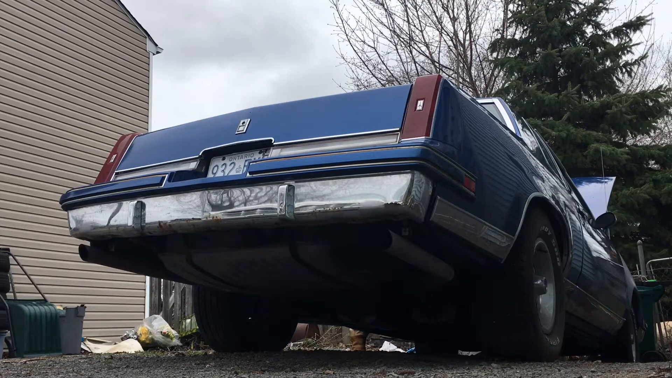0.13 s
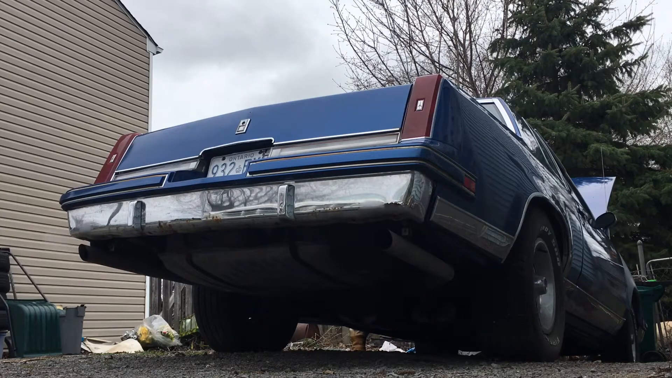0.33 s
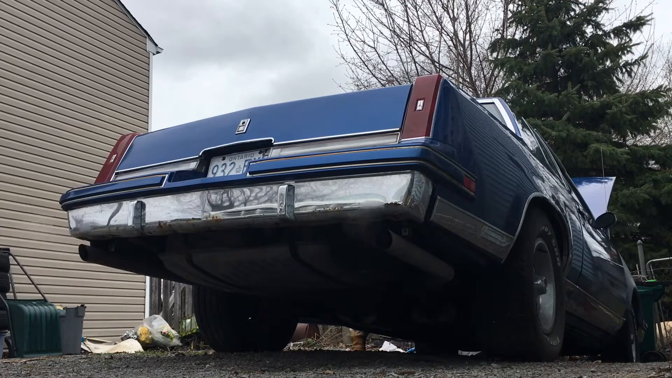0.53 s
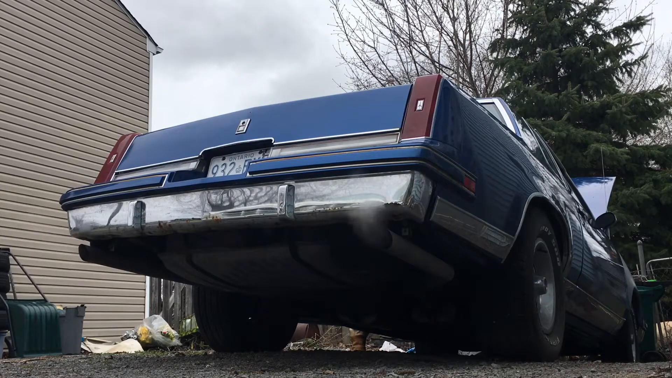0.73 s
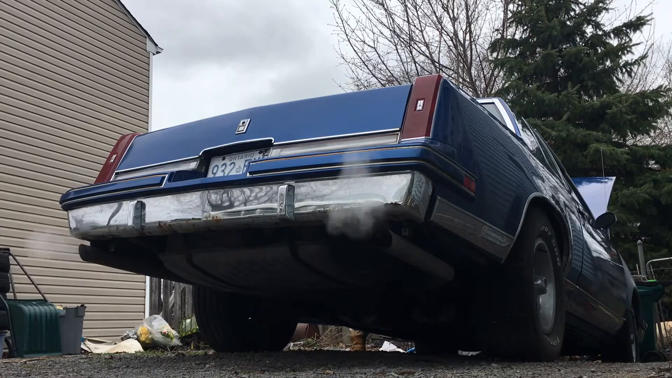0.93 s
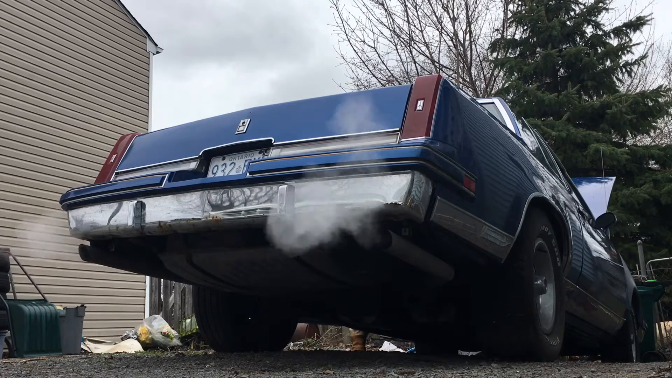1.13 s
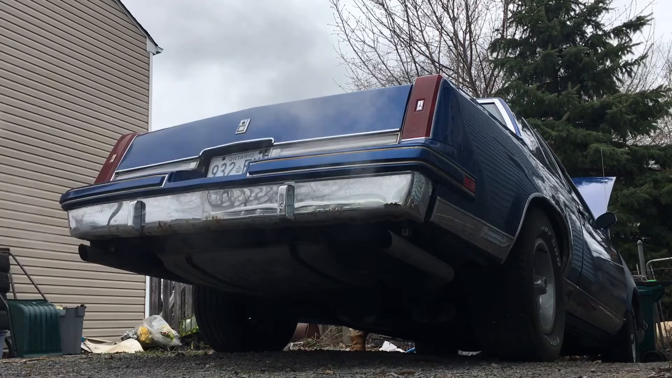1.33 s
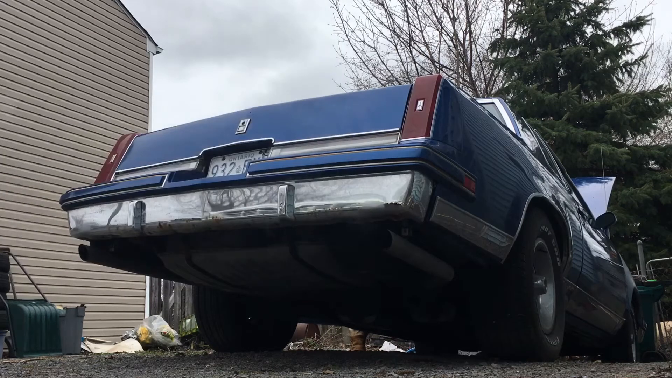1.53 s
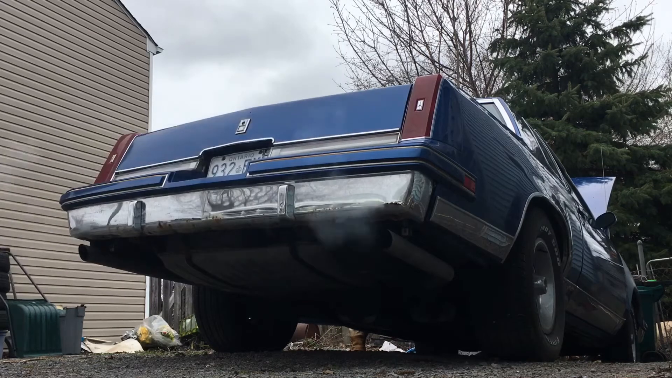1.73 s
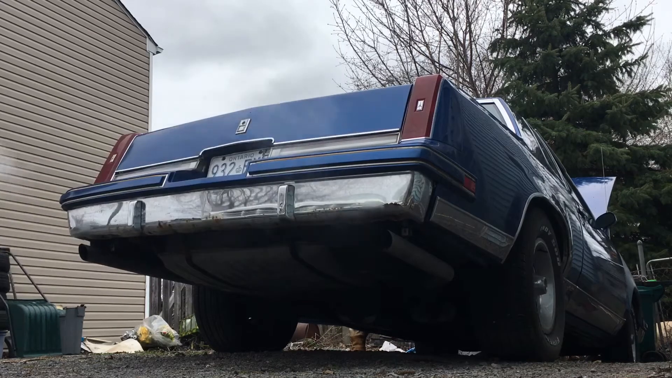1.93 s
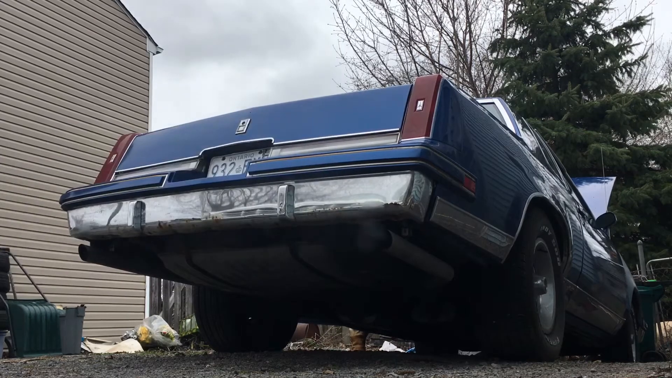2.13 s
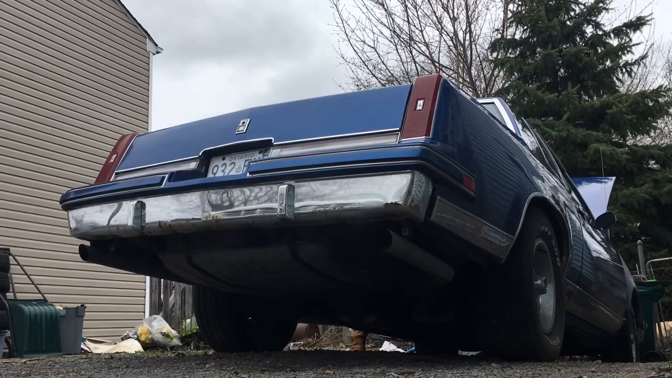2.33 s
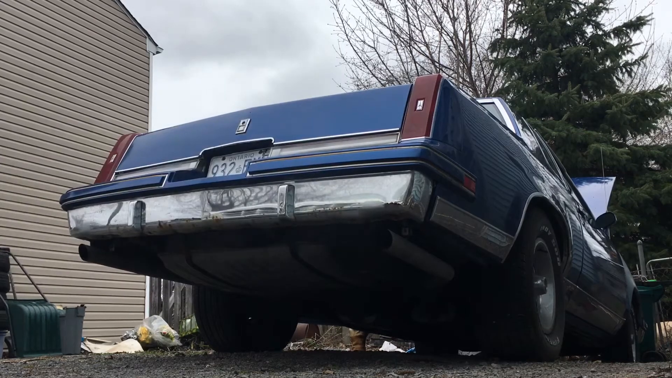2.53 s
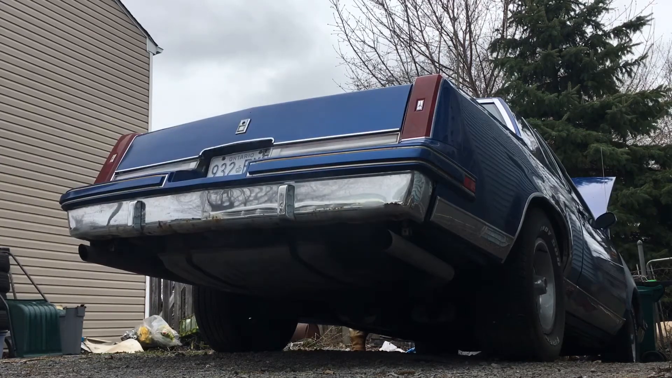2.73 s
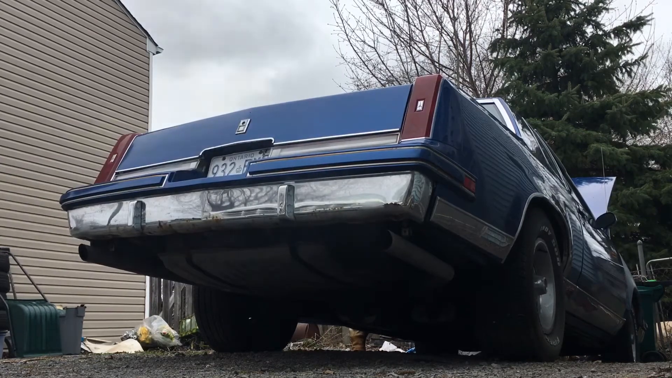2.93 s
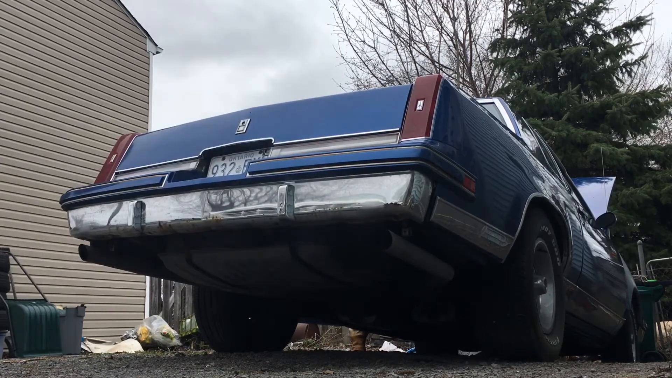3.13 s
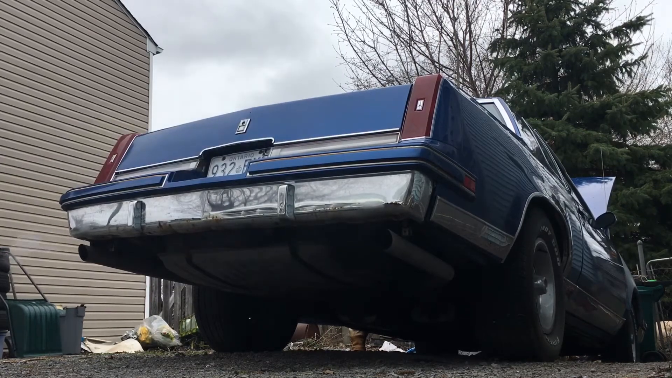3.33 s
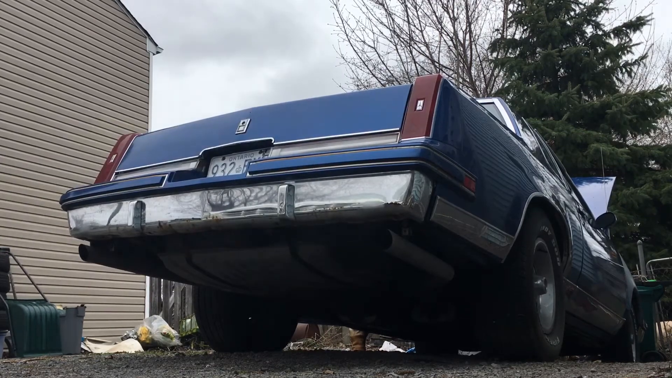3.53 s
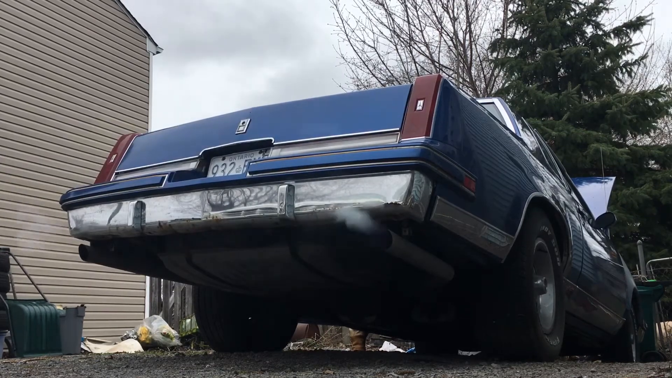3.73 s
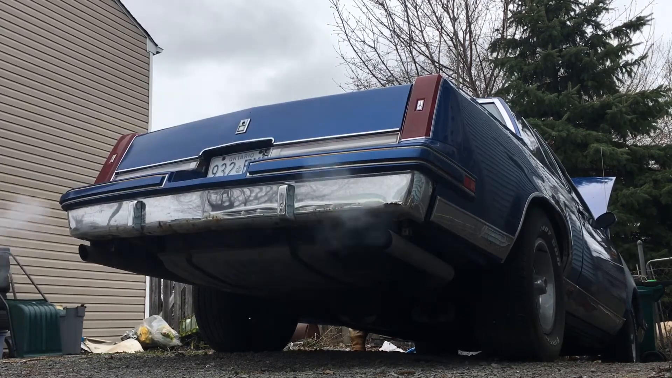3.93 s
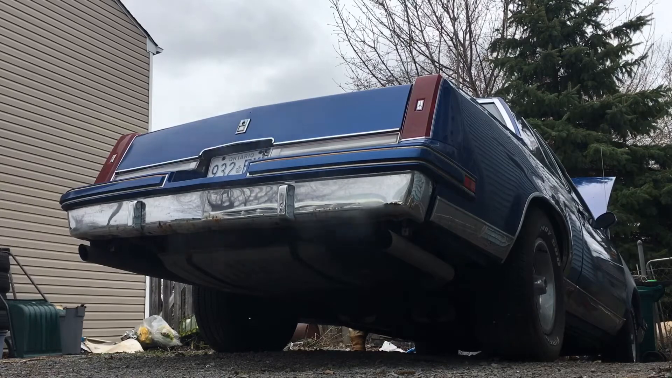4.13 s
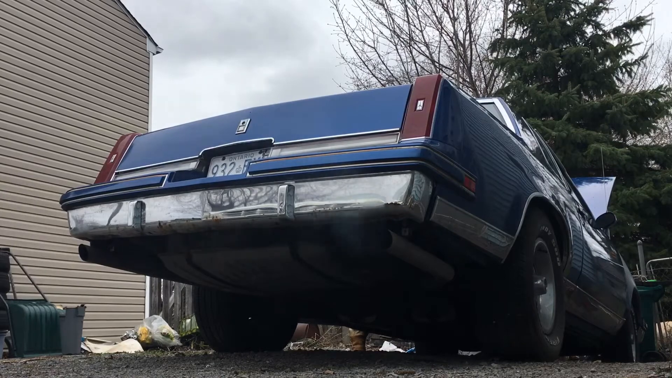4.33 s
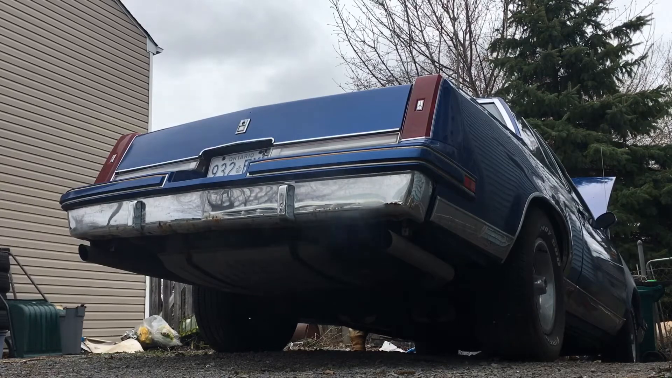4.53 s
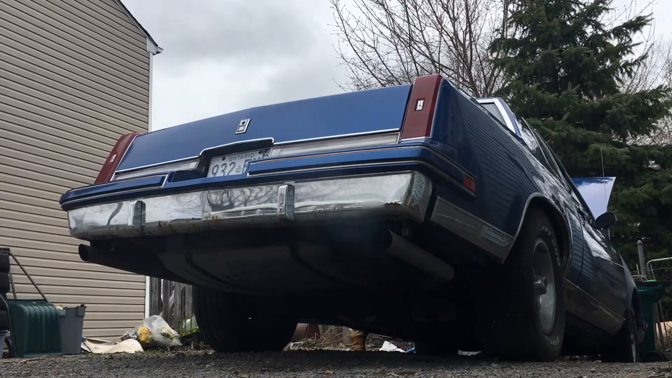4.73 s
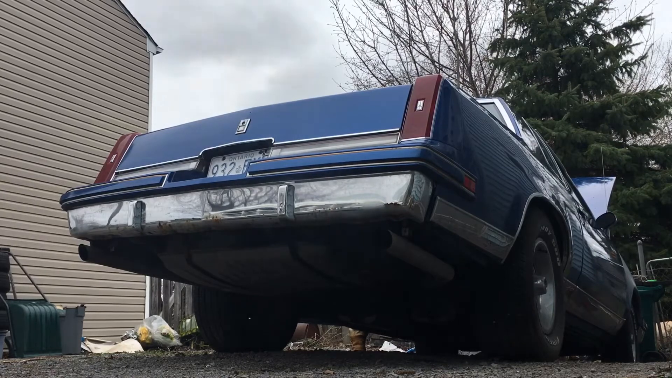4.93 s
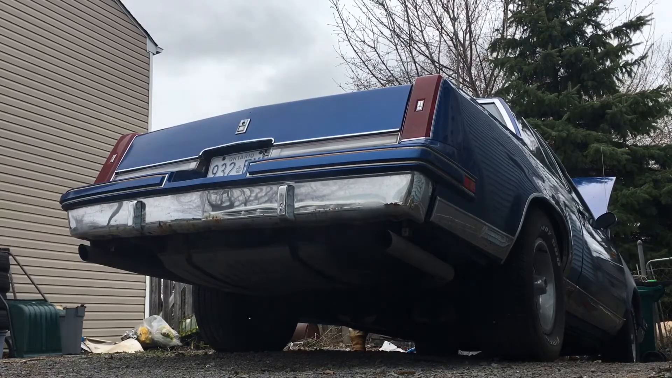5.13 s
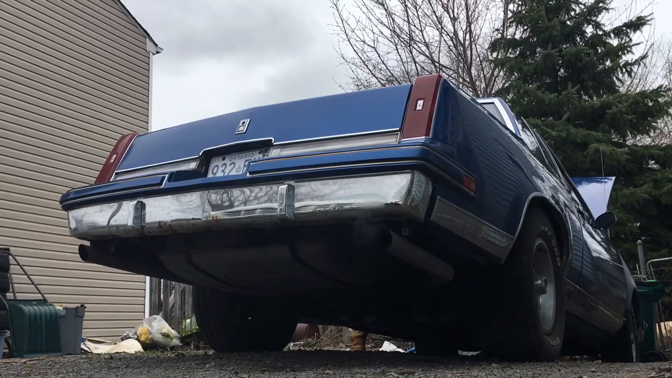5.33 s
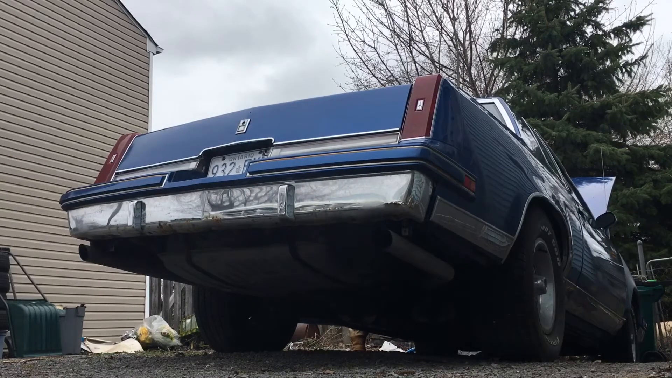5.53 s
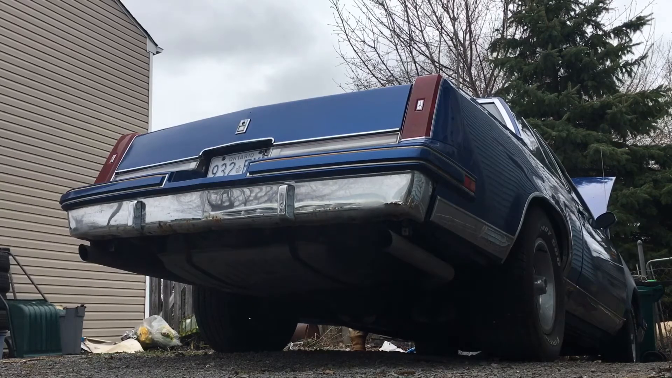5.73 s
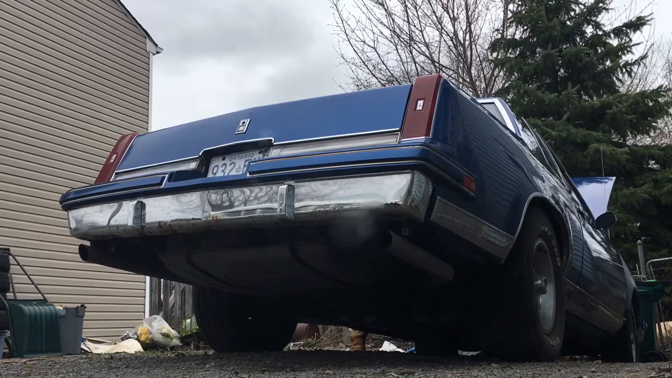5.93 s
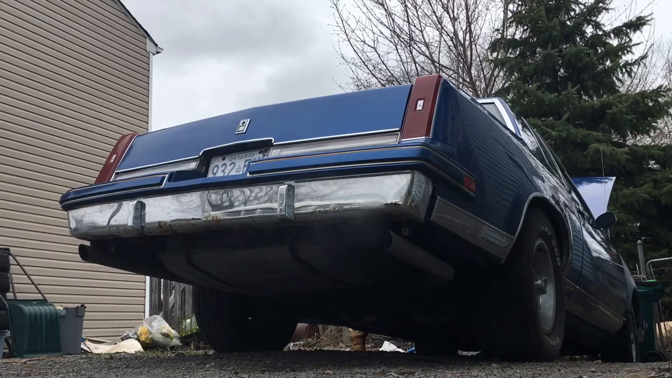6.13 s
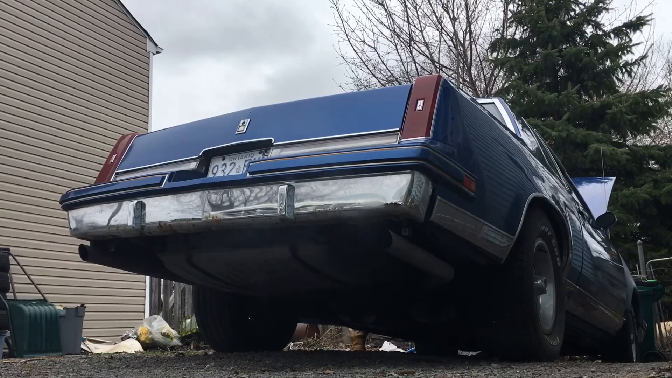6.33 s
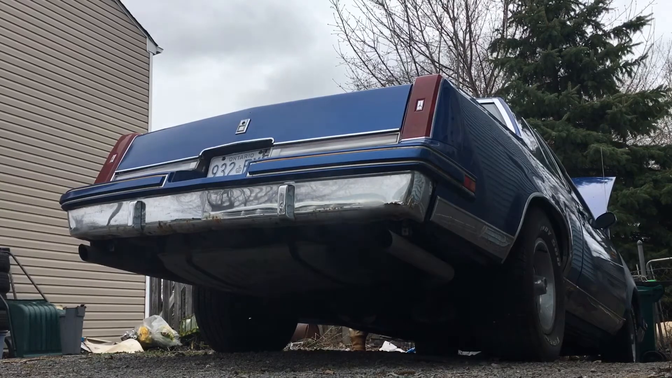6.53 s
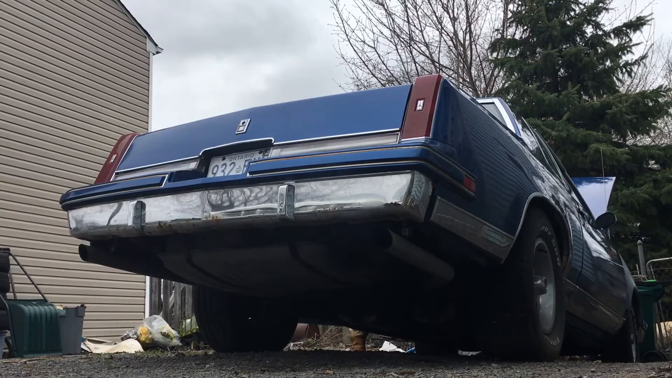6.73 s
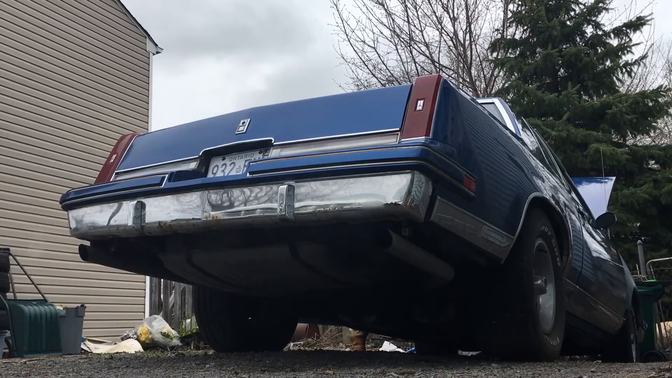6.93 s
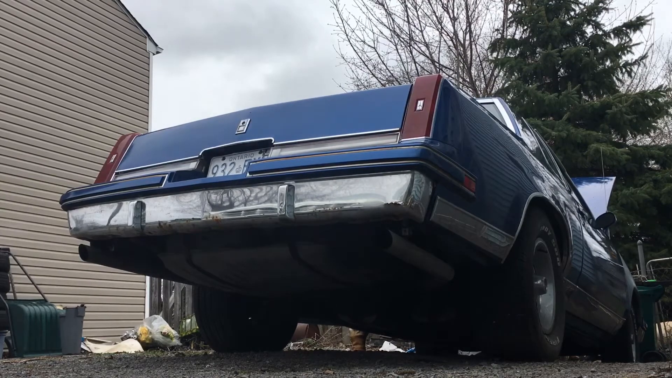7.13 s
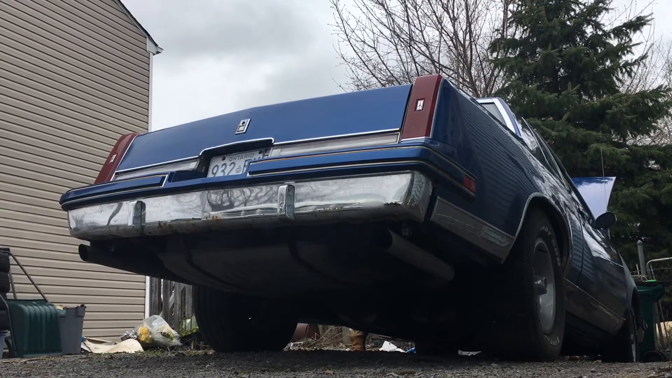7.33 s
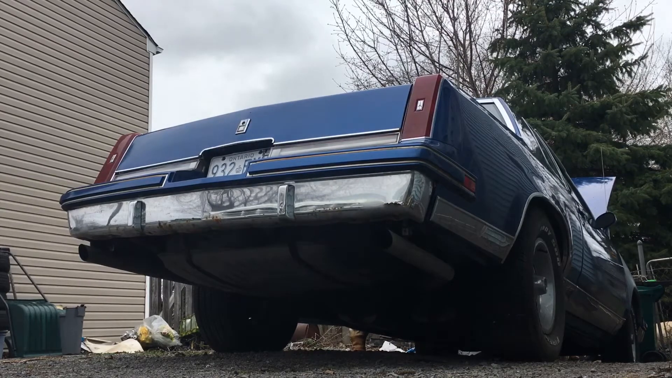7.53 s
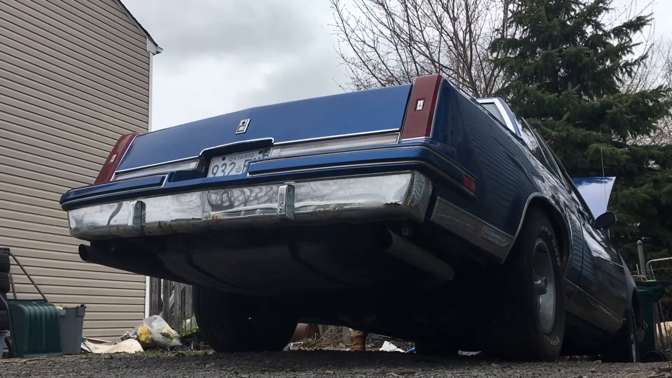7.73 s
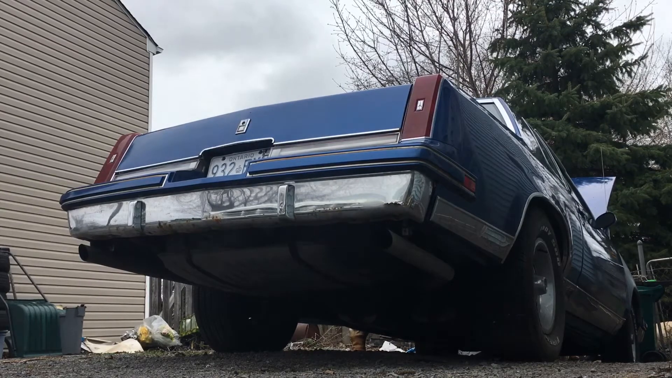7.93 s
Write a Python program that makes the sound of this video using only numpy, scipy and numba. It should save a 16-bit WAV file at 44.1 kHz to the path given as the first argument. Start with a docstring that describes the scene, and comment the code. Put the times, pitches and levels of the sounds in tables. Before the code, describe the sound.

A starter whines and grinds for a second, then a big V8 catches with a roar, revs three times with sharp exhaust cracks, and idles.

```python
"""A starter whines and grinds, a big V8 flares as it catches, is blipped three times and lopes at a fast idle.
Place: a driveway, phone on the ground just behind the twin straight pipes, a house wall near by.
Uneven firings ring pipes of unequal length; gas rasps and hisses at the outlets and cracks under throttle.
The starter is a sagging pinion tone, gear noise and motor drone, with puffs from the pipes.
The quiet yard is steady coloured noise."""
import sys
import numpy as np
from scipy import signal
from scipy.fft import rfft, irfft
from scipy.io import wavfile
from scipy.ndimage import uniform_filter1d
from numba import njit

SR = 44100
rng = np.random.default_rng(int(sys.argv[2]) if len(sys.argv) > 2 else 0)


def wrap_up_sound(samples):
    """Save the sound to the file named by the first command line argument, as 16-bit audio."""
    columns = np.atleast_2d(samples).T
    # keep every value between -1 and 1, then stretch to whole-number steps
    tamed = np.clip(columns, -1, 1)
    steps = np.round(tamed * 32767).astype(np.int16)
    wavfile.write(sys.argv[1], SR, steps)


def boost_factor(decibels):
    """Convert a level in decibels to a linear amplitude factor."""
    exponent = np.asarray(decibels, float) / 20
    return 10 ** exponent


N = 352800
TIME = np.arange(N) / SR


def curves(rows):
    """Columns of a table, joined by straight lines in time."""
    s, *columns = np.transpose(rows)
    return [np.interp(TIME, s, c) for c in columns]


def unit(x):
    """Scale to rms 1."""
    return x / np.sqrt(np.mean(x ** 2))


def band(x, low_hz, high_hz):
    """Steep band-pass."""
    return signal.sosfilt(signal.butter(3, [low_hz, high_hz], "band", fs=SR, output="sos"), x)


def ring(x, modes):
    """Parallel resonances, each (pitch_hz, width_hz, level_db)."""
    return sum(boost_factor(db) * signal.lfilter(*signal.iirpeak(hz, hz / width, SR), x) for hz, width, db in modes)


@njit
def glide(x, hz, width):
    """State-variable band-pass with a moving centre."""
    y, b, l = np.empty(len(x)), 0., 0.
    for i in range(len(x)):
        g, k = np.tan(np.pi * hz[i] / SR), width / hz[i]
        v = (b + g * (x[i] - l)) / (1 + g * (g + k))
        b, l, y[i] = 2 * v - b, l + 2 * g * v, k * v
    return y


def noise(spectrum):
    """Noise of rms 1 with the colour of (pitch_hz, level_db) points."""
    hz, db = np.transpose(spectrum)
    bins_hz = np.arange(N // 2 + 1) * SR / N
    gain = boost_factor(np.interp(np.log(bins_hz + 1), np.log(hz), db))
    return unit(irfft(rfft(rng.standard_normal(N)) * gain, N))


def clicks(seconds, sizes):
    """An impulse at each time."""
    out = np.zeros(N)
    np.add.at(out, np.clip((np.asarray(seconds) * SR).astype(int), 0, N - 1), sizes)
    return out


def fade(x, tau_s):
    """Each impulse becomes an exponential tail of the same height."""
    return signal.lfilter([1], [1, -np.exp(-1 / (tau_s * SR))], x)


# layers of the running engine: start_s, bark level_db, bass level_db, treble (hiss) level_db
ENGINE = [(1.15, -16.5, -8, -28), (1.19, -20, -12, -36.5), (1.32, -7, -9.5, -30.5),
          (1.43, -7.5, -10.5, -35.5), (1.53, -24.5, -20, -59), (1.7, -24, -19.5, -59),
          (1.87, -28, -24.5, -56), (1.95, -14.5, -16, -45), (2.07, -8, -12, -28), (2.18, -18.5, -16, -60.5),
          (2.33, -20, -15, -58.5), (2.58, -25.5, -21, -61.5), (2.94, -10, -9, -47.5),
          (3.08, -9, -18, -29.5), (3.19, -13.5, -20, -46.5), (3.23, -13, -4.5, -38),
          (3.36, -15, -13, -42.5), (3.53, -17, -10.5, -59), (3.67, -25.5, -20.5, -63.5),
          (3.9, -25, -18.5, -59.5), (4.07, -28.5, -23.5, -64), (4.15, -22.5, -16.5, -54.5),
          (4.5, -21.5, -18, -55), (4.79, -19, -17, -50.5), (4.87, -15, -9.5, -44), (4.94, -13.5, -5.5, -42),
          (4.96, -4.5, -12, -26), (5.02, -8, -6.5, -44), (5.14, -11, -3, -30), (5.18, -8, -25, -30),
          (5.27, -15, -16, -45), (5.31, -12, -4, -36.5), (5.44, -14, -11.5, -40.5), (5.71, -21, -16.5, -62),
          (5.9, -23.5, -19.5, -63), (6.3, -22.5, -18.5, -58.5), (6.8, -20, -15.5, -55.5),
          (7.27, -22.5, -16, -56.5), (7.5, -22.5, -20, -59), (7.92, -24.5, -15, -52),
          (8.0, -20, -10, -56.5)]
FIRST_FIRING_S = 1.172
RASP_DB, RASP_PER_BARK, RASP_PER_HISS = -9, 0.48, 0.3  # the rasp follows bark and hiss
CATCH_RASP_DB, CATCH_S = 3.5, 0.28  # the cold catch rasps harder, fading over this time
RASP_FLUTTER_DB = 2  # rms
FLOW_IN_EDGE = 2.6  # turbulence against clean slugs
SMALL_CRACK_DB, SMALL_SCATTER_DB = 6, 3.5  # every firing cracks a little: drive above the hiss, spread
COLD_UNTIL_S, COLD_CRACK_DB = 1.55, -12  # the cold engine hardly cracks


def engine():
    """Firings ring both pipes; the gas jet after each one rasps and hisses at the outlets."""
    bark_db, rumble_db, hiss_db = curves(ENGINE)
    throttle = np.clip((bark_db + 22) / 10, 0, 1)  # the bark follows the gas flow
    settled = 1 - np.exp(-((TIME - ENGINE[0][0]) / CATCH_S) ** 2)
    load = throttle * settled
    flutter = unit(uniform_filter1d(uniform_filter1d(rng.standard_normal(N), size=1100), size=1100))
    rasp_db = RASP_DB + RASP_PER_BARK * bark_db + RASP_PER_HISS * hiss_db
    rasp_db = rasp_db + CATCH_RASP_DB * (1 - settled) + RASP_FLUTTER_DB * flutter
    running = TIME > FIRST_FIRING_S

    cycle_hz, cycles = crankshaft(running)
    seconds, size, jet_db, crack_chance = firings(cycle_hz, cycles)
    slug = unit(-fade(clicks(seconds, size), .0003))
    jet = fade(clicks(seconds, size * boost_factor(jet_db)), .004)
    jet = jet / uniform_filter1d(jet, size=SR // 8).clip(1e-6)
    flow = unit(rng.standard_normal(N) * (3.5 + jet))

    edge = unit(band(slug + FLOW_IN_EDGE * flow, 980, 1790))
    sound = boost_factor(bark_db - 13.0) * (0.13 + settled * throttle ** 2.17) * edge
    sound = sound + boost_factor(rumble_db) * rumble(slug, flow, throttle, cycle_hz)
    sound = sound + boost_factor(bark_db) * bark(slug, flow, throttle, load, flutter, cycles)
    sound = sound + boost_factor(rasp_db) * rasp(slug, jet, throttle, load, bark_db)
    sound = sound + boost_factor(hiss_db) * hiss(jet)

    small_db = np.interp(seconds, TIME, hiss_db) + SMALL_CRACK_DB + SMALL_SCATTER_DB * crack_chance
    small_db = small_db + COLD_CRACK_DB * (seconds < COLD_UNTIL_S)
    return running * sound + cracks(seconds, small_db) + pops() + thuds()


# engine speed: start_s, pitch_hz (four-stroke cycles per second)
SPEED = [(1.13, 4.5), (1.27, 6.5), (1.35, 12), (1.5, 19), (1.8, 11.5), (1.9, 13), (2.1, 26), (2.15, 28),
         (2.6, 14.1), (2.72, 14.6), (2.95, 26.3), (3.08, 33.9), (3.155, 36.7), (3.8, 14.9), (3.9, 13.6),
         (4.0, 10.7), (4.2, 11.6), (4.7, 11.75), (4.8, 12.6), (5.1, 29.4), (5.2, 36.5), (5.23, 37.4),
         (5.7, 20.6), (6.0, 15.5), (6.2, 14.35), (7.1, 14.2), (7.5, 12.2), (8.0, 9.85)]


def crankshaft(running):
    """Speed gained or lost at a steady percentage between rows, and the cycles turned so far."""
    start_s, speed_hz = np.transpose(SPEED)
    cycle_hz = np.exp(np.interp(TIME, start_s, np.log(speed_hz)))
    return cycle_hz, np.cumsum(cycle_hz * running) / SR


# cylinders in firing order: strength level_db, change when the idle lopes level_db,
# travel through the left or the longer right pipe delay_s
CYLINDERS = [(0.3, -16, .0005), (-.8, -2, .0030), (.6, 1, .0038), (-.3, 1, .0001), (.8, -1, .0027),
             (-.6, 3, .0008), (.3, 4.5, .0002), (-.3, -3, .0035)]
# how much the idle lopes: start_s, share (0-1)
LOPE = [(1.2, .8), (1.85, .7), (2.0, .4), (2.3, .15), (2.6, .5), (2.9, .3), (3.6, .15), (3.95, .9),
        (4.1, 1), (4.75, 1), (5.0, .4), (5.6, .15), (5.9, .5), (6.2, .3), (7.2, .3), (7.6, .9), (8.0, .9)]
# uneven burning: start_s, scatter of firing strength scatter_db
UNEVEN = [(1.1, 3), (1.5, 2.2), (2.1, 4), (2.2, 1), (2.45, 2.5), (2.75, 1.5), (3.2, .7), (3.6, 1), (3.9, 3),
          (4.2, 1), (4.8, 2), (5.1, 2.5), (5.3, .7), (5.7, 1.5), (5.9, 2.5), (6.2, .6), (7.3, .8),
          (7.6, 1.5)]
FIRST_CYLINDER = 4  # the row, counted from 0, that catches first
TIMING_S, TIMING_S_PER_DB = .00024, .00008  # spread of the moment a slug leaves; uneven burning widens it


def firings(cycle_hz, cycles):
    """Each cylinder in turn sends a slug of gas down its pipe, early or late, strong or weak by chance."""
    fired = len(CYLINDERS) * cycles
    count = np.arange(1, int(fired[-1]))
    row = (count - 1 + FIRST_CYLINDER) % len(CYLINDERS)
    strength_db, lope_db, travel_s = np.array(CYLINDERS)[row].T
    timing, strength, jet, crack = rng.standard_normal((4000, 4))[count].T
    seconds = np.interp(count, fired, TIME) + travel_s
    strength_db = strength_db + lope_db * np.interp(seconds, *np.transpose(LOPE))
    scatter_db = np.interp(seconds, *np.transpose(UNEVEN))
    seconds = seconds + (TIMING_S + TIMING_S_PER_DB * scatter_db) * timing
    size = boost_factor(strength_db + scatter_db * strength)
    # sparser firings are each heard stronger, so the level does not ride on speed
    size = size / np.sqrt(np.interp(seconds, TIME, cycle_hz))
    return seconds, size, 2.5 * jet, crack


# deep pipe resonances: pitch_hz, width_hz, relative level_db
PIPE_LOW = [(59, 17.6, -7.5), (107.3, 36, -0.1)]
FLOW_IN_RUMBLE_DB = -3  # turbulence against clean slugs


def rumble(slug, flow, throttle, cycle_hz):
    """The long pipes swallow the sharp edge of each slug and leave their deep resonances."""
    drive = slug + boost_factor(FLOW_IN_RUMBLE_DB) * flow
    deepest = ring(drive, PIPE_LOW[:1])
    upper = ring(ring(drive, PIPE_LOW[1:]), PIPE_LOW[1:])
    pipes = unit(band(deepest + upper, 34.3, 158.4))
    out = (1 - 0.44 * throttle) * pipes + 0.5 * throttle * unit(band(slug, 70.7, 226.0))
    # hard firings at low speed pump the deepest resonance
    pumping = throttle * (8.0 / cycle_hz.clip(12)) ** 1.34
    return out + pumping * unit(band(slug, 39.4, 83.5))


# upper pipe resonances: pitch_hz, width_hz, relative level_db
PIPE_HIGH = [(213.3, 67, 10.5), (314, 12, 9), (421, 18.4, 0.5), (508, 7.7, -2.5), (629.3, 40.6, 5),
             (743, 52, -6), (1083, 230, -7)]
# clean engine tones under throttle: multiple of the cycle, peak level_db against the bark
LOAD_TONES = [(3, -12.5), (5, -7.5), (8, -10), (9, -8), (13, -14.5), (17, -15.5)]
FLOW_IN_BARK_DB = 6  # turbulence against clean slugs
PIPE_WAVER, PIPE_RISE = 0.032, 0.016  # resonances waver with gas heat and rise under throttle, as shares
PIPE_NOTE_MULTIPLE, PIPE_NOTE_DB = 22, 3.5  # at fast idle this cycle multiple meets a pipe resonance


def bark(slug, flow, throttle, load, flutter, cycles):
    """Slugs and turbulence ring wavering pipe resonances; throttle adds bare slugs and clean tones."""
    drive = slug + boost_factor(FLOW_IN_BARK_DB) * flow
    pipes = np.zeros(N)
    for k, (hz, width, db) in enumerate(PIPE_HIGH):
        waver = PIPE_WAVER * np.roll(flutter, k * SR)
        pipes += boost_factor(db) * glide(drive, hz * (1 + PIPE_RISE * throttle + waver), 1. * width)
    pipes = unit(band(pipes, 169.0, 801))
    # strong flow damps the pipe, so the slugs come out bare and steep
    bare = unit(band(slug + 0.13 * flow, 274, 848))
    turn = 2 * np.pi * cycles
    tones = sum(boost_factor(db) * np.sin(round(k) * turn) for k, db in LOAD_TONES)
    note = ring(np.sin(PIPE_NOTE_MULTIPLE * turn), [(312.6, 9.6, .1)])
    return (1 - 0.18 * load) * pipes + 0.52 * load * bare + load * tones + boost_factor(PIPE_NOTE_DB) * note


# outlet resonances: pitch_hz (the first at its lowest), width_hz, level_db (the second only)
OUTLET = [(2104, 870, .1), (3080, 1030, .1)]
OUTLET_RISE_HZ_PER_DB = 32.5  # hotter, faster gas lifts the lower outlet resonance


def rasp(slug, jet, throttle, load, bark_db):
    """Turbulent gas, pulsing with the jets, excites the resonances of the outlets."""
    turbulence = 1.11 - 0.19 * throttle + 1.06 * load * jet ** 1.47 + 0.11 * jet
    gas = rng.standard_normal(N) * turbulence + 0.89 * load * slug
    low_hz = OUTLET[0][0] + OUTLET_RISE_HZ_PER_DB * np.clip(bark_db + 28.5, 0, 16)
    low_width_hz = 1. * OUTLET[0][1]
    low = unit(glide(glide(gas, low_hz, low_width_hz), low_hz, low_width_hz))
    high = unit(ring(ring(gas, OUTLET[1:]), OUTLET[1:]))
    return unit(low + (0.017 + 0.54 * load) * high)


# colour of the hiss: pitch_hz, relative level_db (per Hz)
HISS = [(2060, -27), (3500, -14), (4400, -1.5), (4930, -29), (5460, -1.5), (7090, -9.5), (8530, -6.5),
        (11100, -13), (15100, -18.5), (16000, -30.5)]


def hiss(jet):
    """Fine turbulence at the outlets, swelling with each jet."""
    return unit(noise(HISS) * (.5 + jet ** 0.5))


# loudest exhaust cracks: start_s, relative snap level_db, relative chirp level_db
CRACKS = [(1.381, -27, -20), (1.455, -26, -15), (1.9245, -39, -36), (1.9738, -23, -22), (2.0163, -29, -15),
          (2.0316, -7, -11.5), (2.063, -4.5, -8.5), (2.0714, -13, -13), (2.1021, -13, -16),
          (2.139, -16.5, -13), (2.798, -36, -27), (2.817, -30, -22), (2.8497, -21, -18), (2.8843, -15, -14),
          (2.9273, -18, -16), (2.9642, -19, -15), (2.9712, -13, -15), (3.0072, -16, -17), (3.04, -18, -12),
          (3.0634, -10, -8), (3.0706, -17, -9), (3.0929, -13, -10), (3.1212, -20, -12), (3.1578, -24, -16),
          (3.165, -26, -18), (3.2001, -22, -14.5), (3.229, -21, -12), (3.2374, -29, -24),
          (3.2595, -22, -19), (3.2916, -22.5, -17), (3.3243, -28, -20), (3.361, -28, -23),
          (3.4383, -31, -25), (4.842, -32, -31), (4.882, -33, -28), (4.9536, -8, -18), (4.9724, -23, -12),
          (4.991, -14, -16), (5.017, -23, -14), (5.0257, -29, -20), (5.0329, -10, -19), (5.0412, -14, -18),
          (5.056, -18, -21), (5.0703, -8.5, -15), (5.08, -9, -13), (5.1078, -6, -5), (5.1144, -4, -11),
          (5.125, -19, -15), (5.1388, -9, -6.5), (5.146, -8, -13.5), (5.1682, -14, -6.5),
          (5.2752, -24, -14.5), (5.2946, -29, -19), (5.3028, -22, -18), (5.312, -19, -19),
          (5.3343, -22, -15), (5.3645, -16, -12), (5.432, -27, -26), (5.562, -27, -26)]


def cracks(small_s, small_db):
    """Steep pressure fronts: a bright snap with a breath of noise, then the chirp of the pipe."""
    seconds, snap_db, chirp_db = np.transpose(CRACKS)
    seconds = seconds + .001  # the peak follows the onset
    small = clicks(small_s, boost_factor(small_db))
    front = clicks(seconds, boost_factor(snap_db)) + small
    breath = .2 * fade(front, .0005) * rng.standard_normal(N)
    snap = band(front + breath, 6800, 14000)
    whistle = chirp(clicks(seconds, boost_factor(chirp_db)) + boost_factor(-3.5) * small)
    return 4.3 * snap + boost_factor(1.5) * whistle


CHIRP_END_HZ, CHIRP_DROP_HZ, CHIRP_FALL_S, CHIRP_FADE_S = 2350, 2700, .0014, .003


def chirp(fronts):
    """A front spreading across the pipe becomes a short whistle, falling towards the cut-off pitch."""
    t = np.arange(SR // 50) / SR
    turns = CHIRP_END_HZ * t - CHIRP_DROP_HZ * CHIRP_FALL_S * np.exp(-t / CHIRP_FALL_S)
    whistle = np.exp(-t / CHIRP_FADE_S) * np.sin(2 * np.pi * (turns - turns[0]))
    return signal.fftconvolve(fronts, whistle)[:N]


# single rich firings that puff out: start_s, relative rasp level_db, relative pipe knock level_db above it
POPS = [(1.177, -6, -9), (1.208, -2.5, -14), (1.2326, -3.5, -7.5), (1.261, -5, -7), (1.2776, -8, -9),
        (1.2894, -2, -4), (1.3059, -5.5, 4), (1.3281, -1, -6), (1.3514, -10, -9.5), (1.5814, -45, 16),
        (1.898, -17, -3), (1.93, -12.5, -14), (2.3269, -23, 4), (2.6209, -48, 8), (2.6555, -17, 1),
        (2.815, -9, -4), (2.8488, -13, 9), (2.8664, -10, 8), (2.8847, -18, 18), (2.909, -14.5, 3),
        (2.926, -18.5, 9), (2.9657, -17, -4), (3.0076, -10, 6), (3.2302, -10, -6), (3.57, -27, 6),
        (3.8536, -25.5, 5), (3.897, -24, -4), (4.1236, -24, 1), (4.5303, -16.5, 1), (4.571, -22.5, 7),
        (5.5614, -10, 5.5), (5.7133, -37, 3), (5.7318, -32, 17), (5.757, -22, -1), (5.798, -36, 14),
        (5.9953, -29, -1), (6.125, -19.5, 3.5), (6.27, -23, -6), (6.332, -35, -5), (6.6582, -28, -3)]
POP_TAIL_S, POP_RASP_DB, POP_KNOCK_DB = 0.011, 5, 11.5  # gush decay; gains of the two parts


def pops():
    """A short gush through the outlet and a knock in the pipe."""
    seconds, rasp_db, knock_db = np.transpose(POPS)
    gush = fade(clicks(seconds, boost_factor(rasp_db)), POP_TAIL_S) * rng.standard_normal(N)
    outlet = [(2310, 800, 0.083)]
    push = -fade(clicks(seconds + 0.00088, boost_factor(rasp_db + knock_db)), 0.00031)
    knock = band(push, 250, 1000)
    return boost_factor(POP_RASP_DB) * ring(ring(gush, outlet), outlet) + boost_factor(POP_KNOCK_DB) * knock


# first slow firings thud in the pipes: start_s, relative level_db
THUDS = [(1.148, -24), (1.186, -8.5), (1.204, -14), (1.243, -9.5), (1.265, -10)]


def thuds():
    """Slow pushes of gas in the deepest resonance."""
    seconds, level_db = np.transpose(THUDS)
    return boost_factor(42) * ring(fade(clicks(seconds, boost_factor(level_db)), .0001), [(55, 28, .1)])


# pinion whine, sagging into each compression: start_s, pitch_hz, relative level_db
WHINE = [(.19, 1276, -40), (.25, 1140, -32.5), (.3, 1210, -38), (.34, 1275, -28.5), (.357, 1283, -59),
         (.372, 1288, -24), (.395, 1214, -37.5), (.42, 1137, -34), (.47, 1150, -43), (.51, 1426, -40),
         (.525, 1449, -30), (.575, 1227, -32.5), (.61, 1198, -54), (.65, 1390, -32.5), (.7, 1287, -30),
         (.73, 1196, -38.5), (.795, 1406, -34), (.84, 1384, -39), (.86, 1230, -34), (.892, 1374, -29),
         (.96, 1205, -43), (.995, 1406, -32), (1.04, 1432, -36), (1.08, 1366, -49), (1.2, 1300, -40)]
# starter layers: start_s, relative grind level_db, relative drone level_db
STARTER = [(0.17, -102, -49), (0.19, -22, -50), (0.238, -45.5, -13.5), (0.366, -38, -40.5),
           (0.63, -38.5, -30), (0.652, -38.5, -27.5), (0.93, -45, -27), (1.004, -38.5, -27.5),
           (1.058, -39, -28), (1.2, -34, -37)]
# colour of the gear grind: pitch_hz, relative level_db (per Hz)
GRIND = [(120, -42), (200, -17), (249, 2.5), (353, -19), (579, -14), (683, -0.5), (899, -10), (1270, -9),
         (2250, -18), (8270, -31), (16000, -60)]
# solenoid throw, then unfired strokes puffing from the pipes: start_s, relative puff and thump level_db
PUFFS = [(0.184, -11.5, -19), (0.6365, -21, -22), (0.7516, -21, -22.5), (0.8558, -19.5, -23.5),
         (0.9675, -19.5, -21), (1.081, -18, -26)]


def starter():
    """Pinion whine that sags at each compression, gear grind and motor drone; puffs thump the pipe."""
    grind_db, drone_db = curves(STARTER)
    engaged = (TIME > PUFFS[0][0]) & (TIME < STARTER[-1][0])
    grind = boost_factor(grind_db + 6.0) * noise(GRIND)
    motor = [(51, 24, 2.0), (118, 16, 11.5), (266, 12, -30)]
    drone = boost_factor(drone_db - 5) * unit(ring(rng.standard_normal(N), motor))
    return engaged * (pinion() + grind + drone) + puffs()


def pinion():
    """Gear-mesh tone; worn teeth make it throb and add side lines."""
    pitch_hz, level_db = curves(WHINE)
    turn = 2 * np.pi * np.cumsum(pitch_hz) / SR
    throb = 1 + .7 * unit(uniform_filter1d(rng.standard_normal(N), size=400))
    mesh = throb * np.sin(turn + 1.1 * throb)
    half = boost_factor(-2) * throb * np.sin(turn / 2 + throb)
    sides = boost_factor(-7) * np.sin(.88 * turn + throb) + boost_factor(-10) * np.sin(1.15 * turn)
    return np.sqrt(2) * boost_factor(level_db) * (mesh + half + sides)


def puffs():
    """Decaying breaths of noise, each followed by a push that rings the pipe."""
    seconds, puff_db, thump_db = np.transpose(PUFFS)
    air = noise([(200, -5.0), (1300, 9.5), (5000, -4.0), (15000, -22.5), (17000, -34.0)])
    puff = 0.35 * fade(clicks(seconds, boost_factor(puff_db)), 0.042) * air
    push = ring(clicks(seconds + 0.0114, boost_factor(thump_db)), [(134, 34, .1)])
    return puff + boost_factor(66) * ring(push, [(133.2, 4.3, 0.069)])


# colour of the quiet yard: pitch_hz, relative level_db (per Hz)
YARD = [(18, -33), (30, -3), (90, -2), (303, -22), (600, -23), (649, -23), (2120, -33), (2290, -38),
        (6210, -47), (16000, -59)]
YARD_DB = -46


def yard():
    """Steady coloured noise of the place."""
    return boost_factor(YARD_DB) * noise(YARD)


# house wall and ground: delay_s, level_db
ECHOES = [(.0021, -14), (.0176, -15), (.027, -19)]


def scene():
    """Car and its echoes over the quiet yard."""
    car = engine() + starter()
    echoes = sum(boost_factor(db) * np.pad(car, (int(s * SR), 0))[:N] for s, db in ECHOES)
    return (car + echoes + yard())[None]


def low_pass(x):
    """Removes everything above the highest recorded frequency."""
    return signal.sosfilt(signal.butter(12, 16520, fs=SR, output="sos"), x)


def record(dry):
    """The phone microphone loses the deepest bass and rounds peaks off at full scale."""
    mic = signal.sosfilt(signal.butter(3, 38, "high", fs=SR, output="sos"), dry)
    knee = 3.0  # higher bends later and more sharply
    mix = mic / (1 + np.abs(mic) ** knee) ** (1 / knee)
    return low_pass(mix)


dry = scene()
out = record(dry)
wrap_up_sound(out)
```